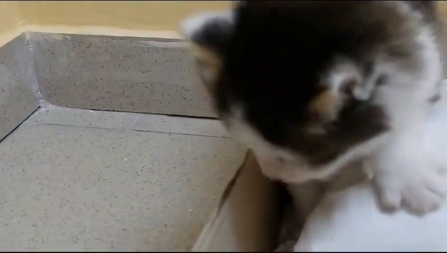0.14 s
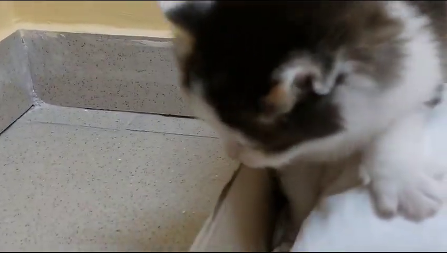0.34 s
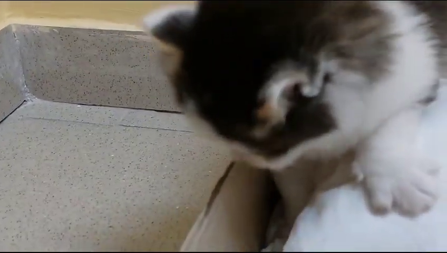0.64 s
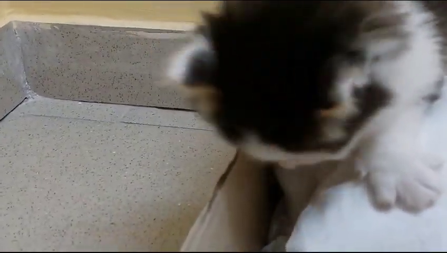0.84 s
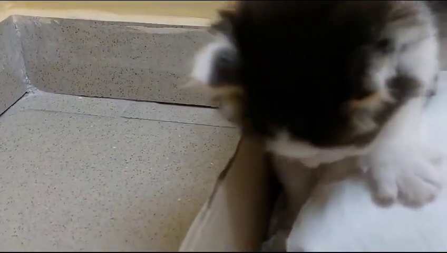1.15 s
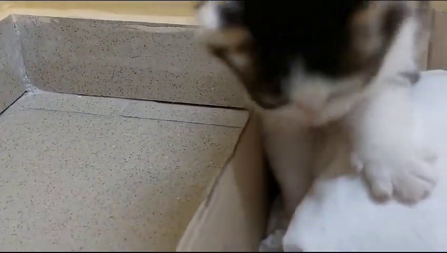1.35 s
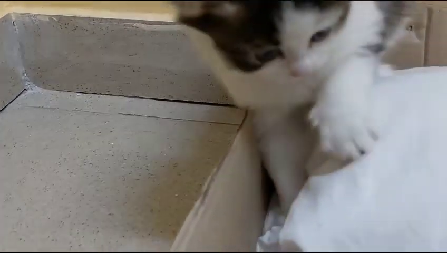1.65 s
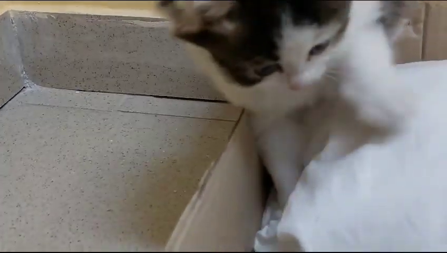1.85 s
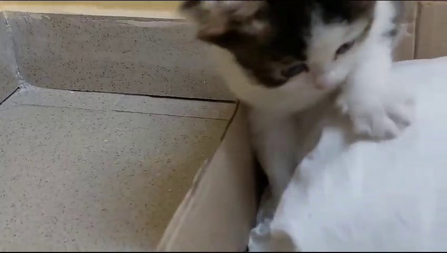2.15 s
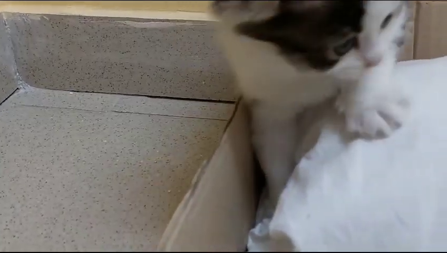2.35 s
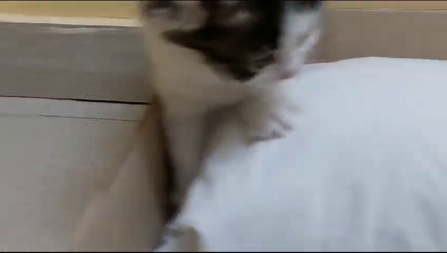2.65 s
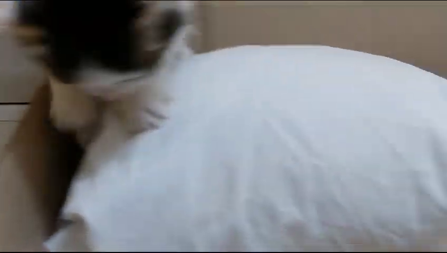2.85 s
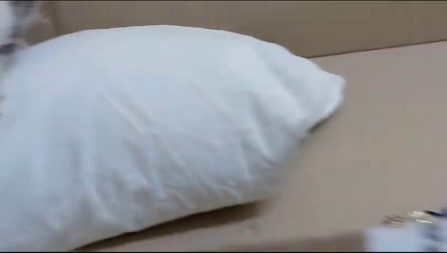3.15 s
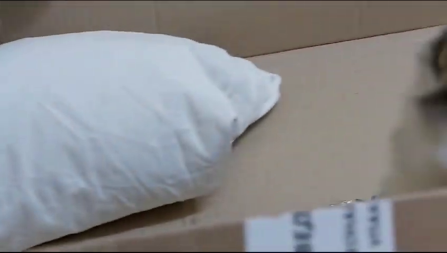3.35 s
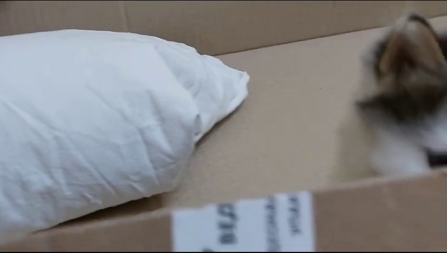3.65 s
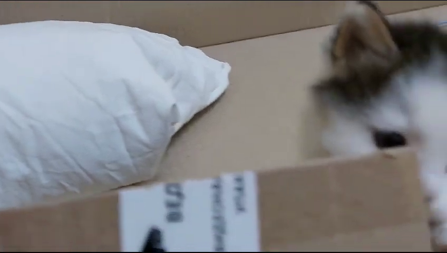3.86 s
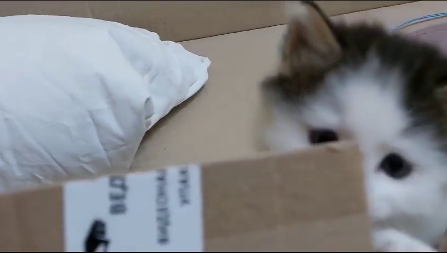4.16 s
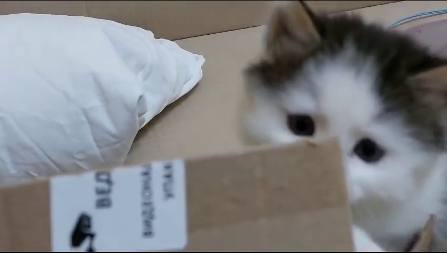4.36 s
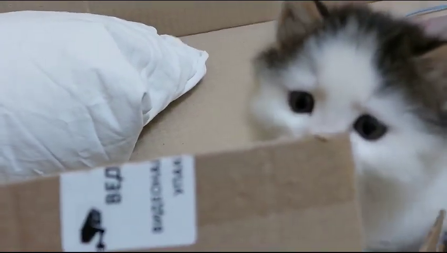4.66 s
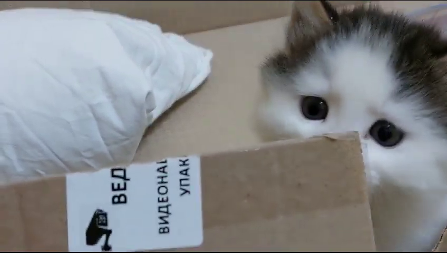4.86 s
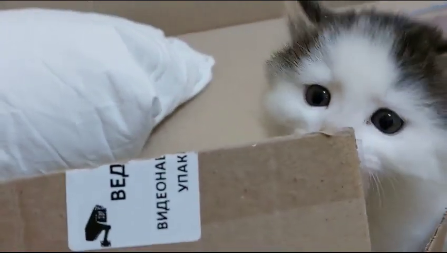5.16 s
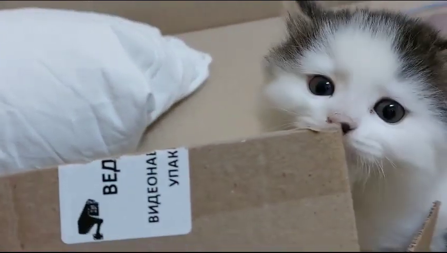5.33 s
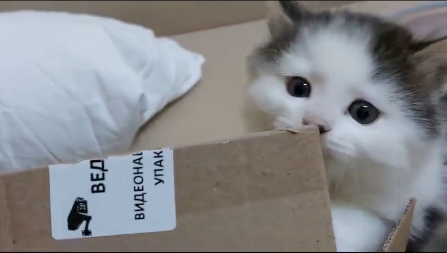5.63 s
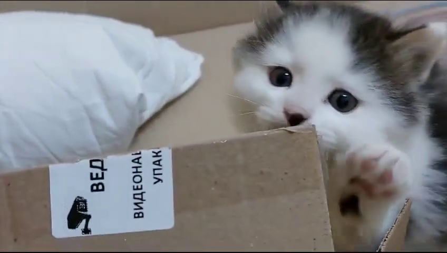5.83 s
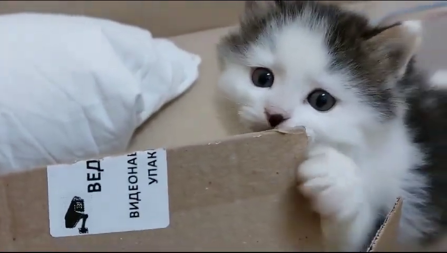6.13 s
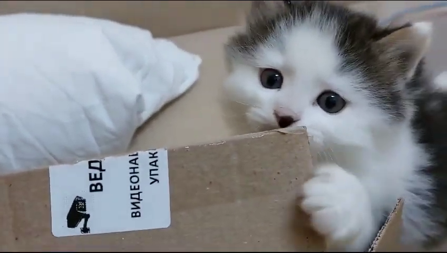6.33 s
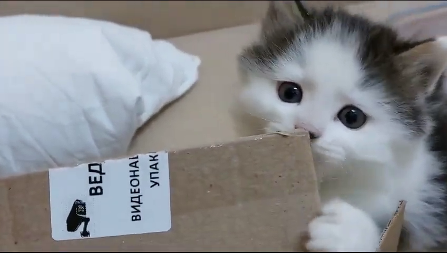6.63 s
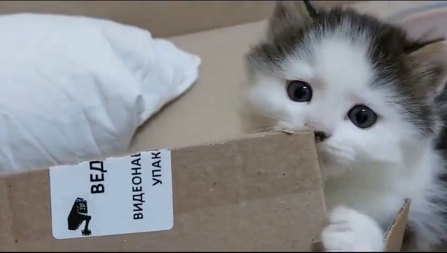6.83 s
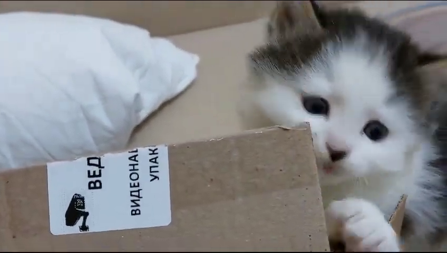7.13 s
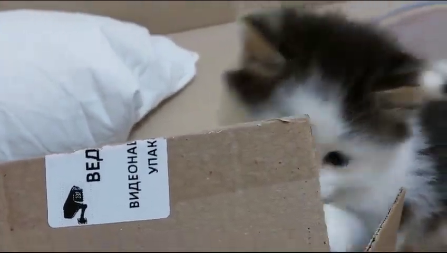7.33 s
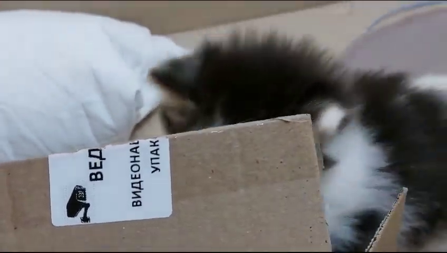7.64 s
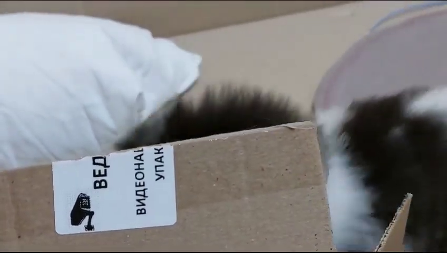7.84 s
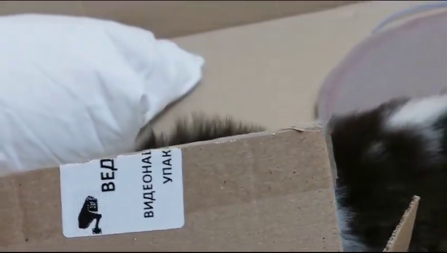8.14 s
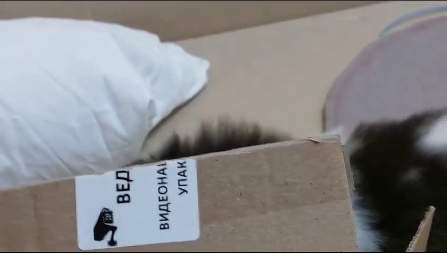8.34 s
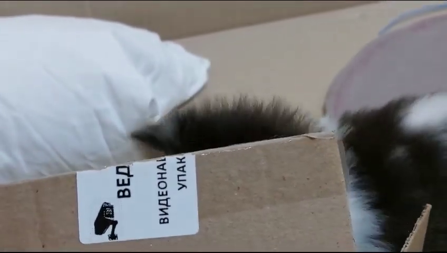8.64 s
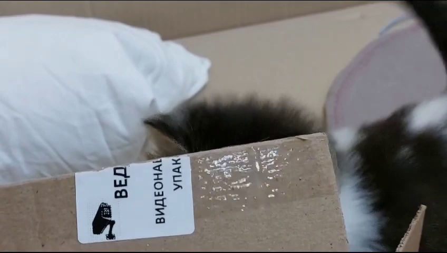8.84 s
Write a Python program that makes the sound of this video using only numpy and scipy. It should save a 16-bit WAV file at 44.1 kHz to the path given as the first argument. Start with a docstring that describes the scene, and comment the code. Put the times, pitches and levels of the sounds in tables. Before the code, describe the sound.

A kitten's claws snag softly on a cloth pillow, then tick and knock on hollow cardboard, ending with a burst of hard, rasping scratches.

```python
"""Kitten in a cardboard box

A kitten clambers about, heard close up in stereo. Its claws snag on a cloth pillow to the right, then tick
on cardboard: short noise bursts, with damped modes for the knock of the box and the ring of its wall.
Shaped noise makes the rumble of shifting weight, paw shuffles, groans of the wall and a fine hiss of fur.
At the end the claws rasp hard across a panel, as trains of stick-slip jolts. A small room answers softly.
"""
import sys
import numpy as np
from scipy import signal
from scipy.fft import rfft, irfft, next_fast_len
from scipy.io import wavfile
from scipy.ndimage import uniform_filter1d, map_coordinates

SR = 44100
rng = np.random.default_rng(int(sys.argv[2]) if len(sys.argv) > 2 else 0)


def master(y):
    """Save y as 16-bit WAV."""
    cut = np.clip(np.atleast_2d(y).T, -1, 1)
    pcm = np.round(cut * 32767)  # scale
    wavfile.write(sys.argv[1], SR, pcm.astype(np.int16))


N = 396459

# Levels in the event tables are before the trims set in scene().
# claws snagging on the pillow: t/s, level/dB
PILLOW_SNAGS = [(0.0907, -37.5), (0.284, -42.5), (0.4067, -44.5), (0.6848, -42.5), (0.8842, -38),
                (1.8013, -42.5), (1.8177, -45), (1.8965, -41), (2.033, -43.5), (2.046, -44), (2.155, -45),
                (2.355, -47.5), (2.427, -45), (2.621, -49), (2.756, -44.5), (2.9873, -48.5),
                (3.0052, -41.5)]
# claws catching on cardboard: t/s, level/dB, ring of the card relative to that level/dB
CARD_TAPS = [(3.2546, -51, 1), (3.2969, -53.5, 11.5), (3.3685, -43.5, 3), (3.6057, -46.5, -9),
             (3.7185, -41.5, 4), (3.895, -42.5, 8.5), (3.9122, -44, 5), (4.1105, -47, 4),
             (4.2748, -41.5, 5), (4.476, -43, 11), (4.5649, -41, -15), (4.585, -35.5, 3),
             (4.6301, -37.5, -13), (4.641, -42, -3), (4.7572, -41.5, 5.5), (4.8872, -35.5, -2),
             (5.242, -36, -6), (5.274, -32, -3), (6.0062, -51, -10), (6.0336, -29.5, -7),
             (6.2315, -45.5, 7.5), (6.2711, -47.5, 2), (6.4453, -49, 2.5), (6.504, -48.5, -2),
             (6.6529, -34, -4.5), (6.9375, -47, -9), (8.841, -44, -9), (8.8827, -34.5, -23)]
# hard pulls across the panel, the shortest a single knock: t/s, length/s, peak level/dB, bright up to f/Hz
CLAW_PULLS = [(8.382, 0.0023, -31.5, 2170), (8.571, 0.0021, -35, 600), (8.6125, 0.0036, -27.5, 3000),
              (8.623, 0.0091, -29.5, 2000), (8.714, 0.0046, -27.5, 1400), (8.734, 0.013, -26, 3000),
              (8.7431, 0.013, -20.5, 2500), (8.757, 0.009, -17, 1110), (8.7699, 0.016, -20.5, 1310),
              (8.789, 0.007, -27.5, 2200), (8.8847, 0.0088, -26.5, 8000), (8.91, 0.0082, -24.5, 3000),
              (8.929, 0.003, -28, 1400)]
# claws dragging between the pulls: t/s, level/dB
DRAG_LEVEL = [(8.34, -53), (8.4, -43), (8.52, -46.5), (8.56, -34.5), (8.69, -33), (8.81, -36), (8.87, -27),
              (8.93, -28.5), (8.99, -34)]
# how hard the shifting weight works the box floor: t/s, level/dB
WEIGHT_LEVEL = [(0, -48), (1.15, -56.5), (1.28, -60), (1.74, -56.5), (1.85, -49.5), (2.45, -52.5),
                (4.25, -56.5), (4.58, -55), (5.3, -49.5), (5.6, -59), (5.97, -65), (6.06, -54.5),
                (6.55, -63.5), (6.72, -53), (7.1, -62.5), (7.9, -63), (8.05, -59), (8.99, -53.5)]
# brushing strokes of fur, each with its own share of coarse rustle:
# middle t/s, length/s, hiss level/dB, rustle relative to hiss/dB
FUR_STROKES = [(0.55, 0.18, -64.5, -10), (1.09, 0.2, -67, -21), (1.42, 0.31, -65.5, -14),
               (1.629, 0.25, -61.5, -6), (2.82, 0.68, -65, -14), (4.455, 0.1, -55, -10.5),
               (4.62, 0.32, -55, -3.5), (4.956, 0.3, -49, -8.5), (5.104, 0.12, -40, -13.5),
               (5.26, 0.38, -49.5, -12), (5.5, 0.36, -66, -21), (5.74, 0.26, -62.5, -16.5),
               (6.45, 0.69, -67, -2.5), (6.85, 0.29, -62, -4), (7.2, 0.81, -71, -12),
               (7.435, 0.18, -57, -14), (7.666, 0.28, -60, -11.5), (7.88, 0.15, -63, -13),
               (7.992, 0.04, -47.5, -14), (8.035, 0.16, -55, -7), (8.162, 0.15, -52, -12.5),
               (8.61, 0.59, -56.5, -2), (8.925, 0.26, -59.5, 4)]
# a paw rubs over cloth or card: middle t/s, length/s, level/dB
PAW_RUBS = [(0.1, 0.91, -74), (0.997, 0.19, -71), (4.695, 0.14, -56), (4.806, 0.11, -61), (6.1, 0.22, -81),
            (8.248, 0.18, -70), (8.611, 0.038, -51.5)]
# the wall groans as the kitten leans on it: t/s, length/s, f/Hz, level/dB
WALL_FLEXES = [(5.204, 0.1, 278, -43.5), (5.328, 0.21, 260, -56.5), (6.068, 0.25, 244, -56),
               (7.654, 0.033, 275, -51), (7.672, 0.21, 280, -59.5), (7.961, 0.069, 274, -47.5),
               (8.06, 0.11, 308, -56)]
# narrow swishes of a claw on card; the very short one is a bright tap:
# middle t/s, length/s, f/Hz, level/dB
CLAW_SWISHES = [(4.632, 0.0045, 2850, -38), (6.335, 0.32, 3100, -74), (6.88, 0.074, 2830, -68),
                (7.68, 0.24, 3900, -70), (8.167, 0.16, 4200, -66)]
# thin bright clicks of a claw tip alone: t/s, level/dB
TIP_CLICKS = [(1.8214, -46.5), (3.069, -52.5), (3.225, -57.5), (3.6168, -50), (4.347, -57.5),
              (4.6383, -39.5), (6.5073, -50), (7.659, -52.5), (7.9727, -38.5)]
# a paw lands with the kitten's weight on it: t/s, level/dB
PAW_STEPS = [(1.812, -53), (2.426, -59), (3.297, -61.5), (3.37, -52.5), (3.719, -57), (4.274, -58.5),
             (5.278, -50.5), (6.038, -54.5), (6.661, -56.5)]

# colour of a claw leaving the pillow cloth: f/Hz, level/dB
SNAG_COLOUR = [(150, -19), (300, 12.5), (490, 4.5), (720, 9.5), (1050, -3), (1500, -3.5), (2500, -7),
               (4000, -15.5), (6000, -18.5), (9000, -18), (16000, -58)]
# colour of a claw leaving cardboard: f/Hz, level/dB
TAP_COLOUR = [(120, 0), (260, 10.5), (420, -9), (600, 2), (850, 1), (1080, -17), (1360, 9.5), (1650, 3),
              (2000, 1.5), (2800, -8), (3450, 1.5), (4600, -6.5), (5600, -25.5), (16000, -13)]
# colour of the bright claw tip: f/Hz, level/dB
TICK_COLOUR = [(3000, -5.5), (6000, -1.5), (8500, 3), (11000, 4.5), (15500, 13.5)]
# colour of the box floor under load: f/Hz, level/dB
RUMBLE_COLOUR = [(30, -19), (65, -3.5), (103, 1.5), (130, -7.5), (175, -16), (600, -63)]
# colour of paws on the floor: f/Hz, level/dB
SHUFFLE_COLOUR = [(120, -8.5), (185, -11), (240, 3.5), (295, 0), (335, -11.5), (390, -8.5), (520, -11.5),
                  (700, -11.5), (1000, -24.5), (1600, -21), (4000, -79)]
# colour of coarse fibres: f/Hz, level/dB
RUSTLE_COLOUR = [(400, -17.5), (800, -3), (1080, -2), (1380, 0), (1900, -1), (2600, 0.5), (3300, -2),
                 (4600, -6), (5800, -16.5), (9000, -18), (16000, -7)]
# colour of fine fur: f/Hz, level/dB
HISS_COLOUR = [(2000, -56), (4500, -11), (6000, -21.5), (8000, -9.5), (10000, -10.5), (12500, -2),
               (15700, -4.5)]
# colour of claws on the panel: f/Hz, level/dB
RASP_COLOUR = [(100, -22.5), (250, -8), (400, 4.5), (620, 1), (750, -3.5), (1050, -11.5), (1400, -8),
               (1700, -21), (2300, -16), (3700, -16.5), (5500, -43.5), (16000, -31)]
# colour of the quiet room tone: f/Hz, level/dB
AIR_COLOUR = [(70, -1.5), (500, -12.5), (6000, -32), (15000, -25)]

# low modes of the whole box: f/Hz, width/Hz, level/dB
BOX_MODES = [(114.2, 19.7, 9), (226.8, 17, 5), (267.3, 6.3, -7.5), (389, 6.6, -21)]
# modes of the scratched panel: f/Hz, width/Hz, level/dB
PANEL_MODES = [(376, 18, 0), (432, 18, -1), (518, 18, -1), (578, 14, 0), (633, 16, 2), (704, 16, -5),
               (802, 20, -2), (1044, 18, 0), (1218, 30, -2), (1358, 32, -1), (1402, 32, -2)]
# hollow ring of the stiff card wall: f/Hz, width/Hz, level/dB
CARD_MODES = [(883, 41, 1), (1352.5, 53, 9), (1433, 55, -15), (1660, 95, -18), (3870, 720, -17)]

# left-right likeness, mostly falling towards the treble: f/Hz, correlation (no unit)
LIKENESS = [(60, .8), (300, .92), (700, .85), (1400, .6), (3000, .2), (7000, .03)]
# left minus right for sounds near the middle: f/Hz, level/dB
CENTRE_BALANCE = [(100, -1), (300, -7), (1000, -1.5), (3000, 2.5), (8000, -0.5), (14000, 10.5)]
# left minus right for sounds at the left: f/Hz, level/dB
LEFT_BALANCE = [(100, 5.8), (280, 1), (700, 36), (1400, 4.6), (3500, 10), (7000, 4.3), (10000, 9),
                (14000, 17.5)]
# left minus right for the panel and the ringing wall: f/Hz, level/dB
NEAR_BALANCE = [(380, 0.5), (1300, 3.4), (4400, 12.4)]
# decay of the room: f/Hz, t60/s
ROOM_DECAY = [(200, 0.49), (2000, 1), (12000, 0.044)]

TOP_HZ = 15900
TYPICAL_DB = -44  # an ordinary catch; the knock varies less about it than the snap does
SHUFFLE_DB, SHUFFLE_RUB_DB = -10.5, 3.5  # shuffle relative to the weight and to the rubbing
TOUCH_HISS_DB, TOUCH_RUSTLE_DB = -22.5, -35  # fur in light, constant contact, relative to the weight
STROKE_STEEPNESS, RUB_STEEPNESS = 2.1, 1.9  # how abruptly a movement starts and stops; 2 is a bell
FLEX_WIDTH = 0.27  # width of the groan as a share of its pitch
STEP_T60_S, STEP_RISE_S = 0.19, 0.009
STEP_BOX_DB = -5  # how much of the box's low modes a step wakes
SNAP_RISE_S, CLICK_T60_S = .0007, .024  # a claw breaks free at once, and a lone click is brief
FIBRE_DB, FIBRE_LOW_HZ = 10.5, 3540  # gain of the flicked fibre, and the pitch below which it gives little
RECATCH_GAP_S, RECATCH_DB = .009, -12  # a freed claw catches again: mean wait, and gain before random size
SNAG_RING_DB = -51  # the card under the pillow rings about equally with every snag
REBOUND_S, REBOUND_DB, REBOUND_TOP_HZ = .0144, -6, 550  # a dull second bump follows each snag
PILLOW_LAG_S = 0.00043  # the pillow lies to the right, so its sound reaches the left later
SLIP_HZ, SLIP_SCATTER, SLIP_SPREAD_DB = 220, .15, 1.5  # rate, unevenness as a share of the period, of size
DRAG_TOP_HZ = 600
ECHO_PILLOW_DB, ECHO_CARD_DB, ECHO_RASP_DB = -13.0, -18, -12.5


def amp(db):
    """Decibels to gain."""
    return 10 ** (np.asarray(db) / 20)


def unit(x):
    """Scale to rms 1; a stereo pair is scaled by its middle."""
    middle = np.atleast_2d(x).mean(0)
    return x / np.sqrt(np.mean(middle ** 2) + 1e-20)


def along(points, hz):
    """Read a (f/Hz, value) curve on a log frequency axis."""
    f, value = np.transpose(points)
    return np.interp(np.log(hz + 1), np.log(f + 1), value)


def level_curve(rows):
    """Draw a (t/s, level/dB) table as one level per sample."""
    s, db = np.transpose(rows)
    return np.interp(np.arange(N) / SR, s, db)


def wobble(rate):
    """A smooth random curve with rate knots a second."""
    knots = rng.standard_normal(int(N * rate / SR) + 4)
    return map_coordinates(knots, [np.arange(N) * rate / SR])


def filtered(x, response):
    """Pass x through a complex response of frequency."""
    n = x.shape[-1]
    m = 2 * next_fast_len(n // 2 + 4096)
    return irfft(rfft(x, m) * response(np.fft.rfftfreq(m, 1 / SR)), m)[..., :n]


def colour(points, hz, ripple_db=0, ripple_hz=150):
    """Causal filter with a given outline; each spot of contact adds its own small resonances."""
    ripple = map_coordinates(rng.standard_normal(1000), [hz / ripple_hz], mode="wrap")
    outline = amp(along(points, hz) + ripple_db * ripple)
    # folding the cepstrum forward gives minimum phase
    cepstrum = irfft(np.log(outline))
    half = len(cepstrum) // 2
    cepstrum[1:half] *= 2
    cepstrum[half + 1:] = 0
    return np.exp(rfft(cepstrum))


def resonances(modes, hz):
    """Causal response of a few damped modes."""
    return sum(amp(db) * 1j * hz * w / (c * c - hz * hz + 1j * hz * w) for c, w, db in modes)


def spread(pair, balance, response):
    """Two unrelated excitations become left and right: alike in the bass, apart in the treble."""
    def mid_side(hz):
        turn = np.arccos(np.clip(along(LIKENESS, hz), -1, 1)) / 2
        return response(hz) * np.array([np.ones_like(hz), np.tan(turn)])

    def lean(hz):
        gains = amp(np.outer([.5, -.5], along(balance, hz)))
        return gains / np.sqrt(np.mean(gains ** 2, 0))

    mid, side = filtered(pair, mid_side)
    return filtered(np.array([mid + side, mid - side]), lean)


def left_late(pair, lag):
    """Delay the left side against the right."""
    return filtered(pair, lambda hz: np.exp(np.outer([-1j, 1j], np.pi * hz * lag)))


def add(track, s, sound):
    """Mix a sound in at time s."""
    start = round(s * SR)
    track[:, start:start + sound.shape[1]] += sound[:, :N - start]


def swell(middle, length, steepness=3):
    """One smooth movement builds up and ebbs."""
    gain = np.zeros(N)
    first = max(0, round((middle - 2 * length) * SR))
    last = min(N, round((middle + 2 * length) * SR))
    near = np.arange(first, last)
    gain[near] = np.exp(-np.abs(2.6 * (near / SR - middle) / length) ** steepness)
    return gain


def movements(rows, steepness):
    """Joint gain of several smooth movements, summed as power."""
    return np.sqrt(sum((amp(db) * swell(middle, length, steepness)) ** 2 for middle, length, db in rows))


def burst(t60, rise, edge=0):
    """A 0.2 s crackle that swells and dies away; edge is the size of the first clean break."""
    t = np.arange(SR // 5) / SR
    crackle = rng.standard_normal((2, len(t))) * amp(-60 * t / t60) * (1 - np.exp(-t / rise))
    crackle[:, SR // 1500] += edge * np.linalg.norm(crackle[0]) * rng.choice([-1, 1], size=2)
    return crackle


def friction(outline, balance, grain_db, grain_rate):
    """Rubbing of rms 1: noise as countless tiny slips, its level wobbling so that they come in clumps."""
    grains = rng.standard_normal((2, N)) * amp(grain_db * wobble(grain_rate))
    return unit(spread(grains, balance, lambda hz: colour(outline, hz)))


def drifting(x, depth_db):
    """The rubbed spot keeps moving, so its resonances come and go."""
    z = signal.stft(x, nperseg=512)[2]
    field = rng.standard_normal(z.shape[1:])
    for _ in range(2):
        field = uniform_filter1d(field, size=4, axis=0)
        field = uniform_filter1d(field, size=14, axis=1)
    moved = signal.istft(z * amp(depth_db * field / field.std()), nperseg=512)[1]
    return unit(moved[:, :N])


def air():
    """The quiet room tone is steady noise, darker towards the treble."""
    tone = spread(rng.standard_normal((2, N)), CENTRE_BALANCE, lambda hz: amp(along(AIR_COLOUR, hz)))
    return amp(-71.5) * unit(tone)


def room(x):
    """A small furnished room: a decaying noise tail in which the treble dies first."""
    hz, t, z = signal.stft(rng.standard_normal((2, SR // 2)), SR, nperseg=256)
    decay = amp(-60 * t / along(ROOM_DECAY, hz)[:, None])
    tail = signal.istft(z * decay, SR, nperseg=256)[1]
    tail = np.pad(tail / np.linalg.norm(tail[0]), ((0, 0), (SR // 120, 0)))  # short pre-delay
    return signal.fftconvolve(x, tail, axes=1)[:, :N]


def body(weight, rubbing):
    """Shifting weight rumbles in the box floor, the paws shuffle over it and the wall groans hoarsely."""
    rumble = weight * friction(RUMBLE_COLOUR, CENTRE_BALANCE, grain_db=3.0, grain_rate=30)
    shuffle_gain = np.hypot(amp(SHUFFLE_DB) * weight, amp(SHUFFLE_RUB_DB) * rubbing)
    shuffle = shuffle_gain * friction(SHUFFLE_COLOUR, CENTRE_BALANCE, grain_db=2.0, grain_rate=80)
    groans = np.zeros(N)
    for s, length, pitch_hz, db in WALL_FLEXES:
        mode = [(pitch_hz, pitch_hz * FLEX_WIDTH, 0)]
        wall = filtered(rng.standard_normal(N), lambda hz: resonances(mode, hz) ** 2)
        groans += amp(db) * swell(s + length / 2, length) * unit(wall)
    return rumble + shuffle + groans


def fur(weight, brushing, rubbing):
    """Fur brushes past, close on the left; stray hairs and fibres tick as it goes."""
    hiss = np.hypot(brushing, amp(TOUCH_HISS_DB) * weight)
    rustle = np.hypot(rubbing, amp(TOUCH_RUSTLE_DB) * weight)
    flicks = (rng.random(N) < 220 / SR) * rng.standard_normal((2, N))  # about 220 a second
    ticks = amp(-5) * unit(spread(flicks, LEFT_BALANCE, lambda hz: colour(RUSTLE_COLOUR, hz)))
    fibres = friction(RUSTLE_COLOUR, LEFT_BALANCE, grain_db=3.2, grain_rate=500)
    coarse = drifting(fibres, depth_db=1.8) + ticks
    hairs = friction(HISS_COLOUR, LEFT_BALANCE, grain_db=0.5, grain_rate=410)
    fine = drifting(hairs, depth_db=1.0)
    return amp(0.69 * wobble(55)) * rustle * coarse + amp(2.15 * wobble(45)) * hiss * fine


def swishes():
    """A claw on card hisses unevenly in one narrow resonance; a very short swish is heard as a bright tap."""
    track = np.zeros((2, N))
    for middle, length, pitch_hz, db in CLAW_SWISHES:
        mode = [(pitch_hz, pitch_hz / 3, 0)]
        swish = spread(rng.standard_normal((2, N)), LEFT_BALANCE, lambda hz: resonances(mode, hz) ** 2)
        track += amp(db + 3.8 * wobble(60)) * swell(middle, length) * unit(swish)
    return track


def steps():
    """Soft pads thump on the card and set the box swinging on its low modes."""
    def card(hz):
        pads = colour(SHUFFLE_COLOUR, hz, ripple_db=3, ripple_hz=70)
        return pads + amp(STEP_BOX_DB) * resonances(BOX_MODES, hz)

    track = np.zeros((2, N))
    for s, db in PAW_STEPS:
        thump = spread(burst(STEP_T60_S, rise=STEP_RISE_S, edge=1.0), CENTRE_BALANCE, card)
        add(track, s, amp(db) * unit(thump))
    return track


def clicks(tick_db):
    """A claw tip flicks off a fibre, too lightly to move the box: a brief burst, mostly treble."""
    def tip_and_fibre(hz):
        fibre = amp(FIBRE_DB) * colour(RUSTLE_COLOUR, hz) * 1j * hz / (FIBRE_LOW_HZ + 1j * hz)
        return colour(TICK_COLOUR, hz, ripple_db=4, ripple_hz=394) + fibre

    track = np.zeros((2, N))
    for s, db in TIP_CLICKS:
        click = spread(burst(CLICK_T60_S, rise=.0005, edge=1), LEFT_BALANCE, tip_and_fibre)
        add(track, s, amp(db + tick_db) * unit(click))
    return track


def ringing(rows, ring_db, chatter_db):
    """Each catch rings the card wall with a woody knock; the claw's chatter keeps it sounding faintly."""
    track = np.zeros((2, N))
    for s, db in rows:
        chatter = amp(chatter_db) * unit(burst(.5, rise=.002))
        flick = unit(burst(.003, rise=SNAP_RISE_S, edge=2)) + chatter
        tension = 1 + .012 * rng.standard_normal()  # shifts all the modes a little
        knock = spread(flick, NEAR_BALANCE, lambda hz: resonances(CARD_MODES, hz * tension))
        add(track, s, amp(db + ring_db) * unit(knock))
    return track


def catching(t60, edge, count=3):
    """The first snap of a claw, then a few usually weaker ones at uneven intervals."""
    snaps = burst(t60, rise=SNAP_RISE_S, edge=edge)
    for wait in np.cumsum(rng.exponential(RECATCH_GAP_S, size=count)):
        again = burst(t60 / 2, rise=SNAP_RISE_S, edge=edge)
        again = np.pad(again, ((0, 0), (round(wait * SR), 0)))
        snaps = snaps + amp(RECATCH_DB) * rng.rayleigh() * again[:, :snaps.shape[1]]
    return snaps


def rebound(hz):
    """Response of a sound followed by its muffled second bump."""
    return 1 + amp(REBOUND_DB) * np.exp(-2j * np.pi * hz * REBOUND_S) / (1 + 1j * hz / REBOUND_TOP_HZ)


def claws(rows, outline, balance, snap_db, snap_t60, edge, settle_db, settle_t60,
          knock_db, knock_grows, knock_tilt, knock_t60, tick_db, tick_t60):
    """A claw lets go: a sharp snap and a bright tick, then fibres settle and the box swings on its low modes."""
    def snap_colour(hz):
        return colour(outline, hz, ripple_db=2, ripple_hz=170)

    def settle_colour(hz):
        return colour(RUSTLE_COLOUR, hz, ripple_db=2.5, ripple_hz=90)

    def tip_colour(hz):
        return colour(TICK_COLOUR, hz, ripple_db=4, ripple_hz=394)

    track = np.zeros((2, N))
    for s, db in rows:
        snap = spread(catching(snap_t60, edge), balance, snap_colour)
        settle = spread(burst(settle_t60, rise=0.00067), balance, settle_colour)
        tip = spread(burst(tick_t60, rise=.0005, edge=edge), balance, tip_colour)
        contact = amp(snap_db) * unit(snap) + amp(settle_db) * unit(settle) + amp(tick_db) * unit(tip)
        add(track, s, amp(db) * contact)

        swing = burst(knock_t60, rise=0.0049, edge=0.3) + amp(-18) * burst(0.98, rise=0.023)
        load = 1 + 0.061 * rng.standard_normal()  # the kitten's weight detunes the box
        # a negative tilt is a soft contact, which favours the lowest mode
        box = lambda hz: resonances(BOX_MODES, hz * load) * (1 + hz / 50) ** knock_tilt
        thud = spread(swing, CENTRE_BALANCE, box)
        thud_db = TYPICAL_DB + knock_db + knock_grows * (db - TYPICAL_DB)
        add(track, s, amp(thud_db) * unit(thud))
    return track


def slips(length):
    """A claw sticks and slips for a while: a train of sharp jolts, the first one on time."""
    chance = rng.standard_normal((SR // 10, 2))
    gaps = np.abs(1 + SLIP_SCATTER * chance[1:, 0])
    times = np.append(0, np.cumsum(gaps)) / SLIP_HZ
    held = times < length
    sizes = amp(SLIP_SPREAD_DB * chance[held, 1])
    jolts = np.bincount((times[held] * SR).astype(int), sizes, round(length * SR) + SR // 2)
    return np.array([jolts, rng.choice([-1, 1]) * jolts])


def scratch(grit_db, pull_grit_db, ring_db, hollow_db, drag_db, uneven_db):
    """Claws drag lightly over the panel, then bite in separate hard pulls that also ring the card wall."""
    def panel(hz):
        return colour(RASP_COLOUR, hz) * (1 + amp(ring_db) * resonances(PANEL_MODES, hz))

    started = np.arange(N) / SR > DRAG_LEVEL[0][0]
    drag = amp(level_curve(DRAG_LEVEL) + drag_db + uneven_db * wobble(70)) * started
    grit = amp(grit_db) * rng.standard_normal((2, N))
    drive = grit + slips(N / SR)[:, :N] * np.sqrt(SR / SLIP_HZ)
    dull_panel = lambda hz: panel(hz) / (1 + 1j * hz / DRAG_TOP_HZ)
    track = spread(drive * drag, NEAR_BALANCE, dull_panel) / np.std(filtered(drive[0], panel))
    for s, length, db, top_hz in CLAW_PULLS:
        jolts = slips(length)
        t = np.arange(jolts.shape[1]) / SR
        pull_grit = amp(pull_grit_db) * rng.standard_normal(jolts.shape) * np.exp(-(t / length) ** 2)

        def panel_and_wall(hz):
            hollow = amp(hollow_db) * resonances(CARD_MODES, hz)
            return (panel(hz) + hollow) / (1 + 1j * hz / (2 * top_hz)) ** 2

        pull = spread(jolts + pull_grit, NEAR_BALANCE, panel_and_wall)
        add(track, s, amp(db) * pull / np.abs(pull.mean(0)).max())
    return track


def scene():
    """The kitten, its box and the quiet room."""
    weight = amp(level_curve(WEIGHT_LEVEL))
    hiss_moves = [(s, length, db) for s, length, db, _ in FUR_STROKES]
    rustle_moves = [(s, length, db + coarse) for s, length, db, coarse in FUR_STROKES]
    brushing = movements(hiss_moves, STROKE_STEEPNESS)
    rubbing = movements(rustle_moves + PAW_RUBS, RUB_STEEPNESS)

    pillow = claws(PILLOW_SNAGS, SNAG_COLOUR, CENTRE_BALANCE, snap_db=-18, snap_t60=0.031, edge=0.51,
                   settle_db=-30.0, settle_t60=0.36, knock_db=-14, knock_grows=0.44,
                   knock_tilt=-0.33, knock_t60=0.11, tick_db=-32.0, tick_t60=0.0099)
    pillow = left_late(filtered(pillow, rebound), PILLOW_LAG_S)

    taps = [(s, db) for s, db, _ in CARD_TAPS]
    card = claws(taps, TAP_COLOUR, LEFT_BALANCE, snap_db=-22.5, snap_t60=0.016, edge=0.4,
                 settle_db=-39.0, settle_t60=1.0, knock_db=-17.5, knock_grows=0.41,
                 knock_tilt=0.23, knock_t60=0.079, tick_db=-45.0, tick_t60=0.034)
    rings = [(s, db + ring) for s, db, ring in CARD_TAPS] + [(s, SNAG_RING_DB) for s, _ in PILLOW_SNAGS]
    card = card + ringing(rings, ring_db=-27.5, chatter_db=-10.5) + clicks(tick_db=-14.0)

    rasp = scratch(grit_db=-2.5, pull_grit_db=-20.5, ring_db=4, hollow_db=-7.5, drag_db=-8.0, uneven_db=2.5)
    echo = room(amp(ECHO_PILLOW_DB) * pillow + amp(ECHO_CARD_DB) * card + amp(ECHO_RASP_DB) * rasp)
    background = air() + echo + body(weight, rubbing)
    return background + fur(weight, brushing, rubbing) + swishes() + steps() + pillow + card + rasp


def record(dry):
    """The microphone loses the deepest bass, below about 42 Hz, and nothing passes above the band limit."""
    return filtered(dry, lambda hz: (hz < TOP_HZ) * hz ** 3 / np.hypot(hz ** 3, 42 ** 3))


dry = scene()
out = record(dry)
master(out)
```